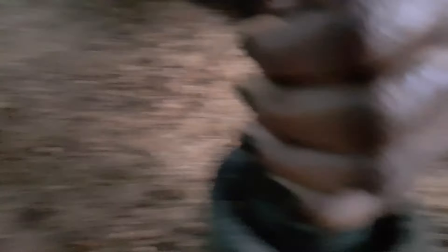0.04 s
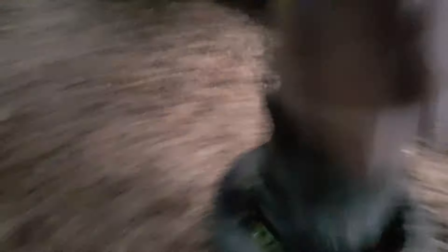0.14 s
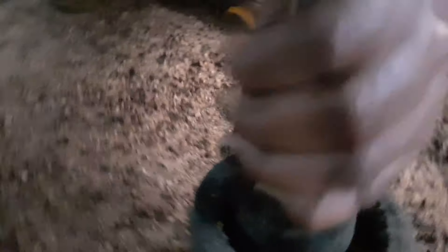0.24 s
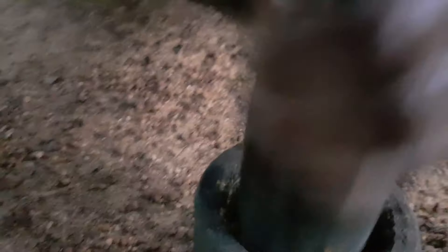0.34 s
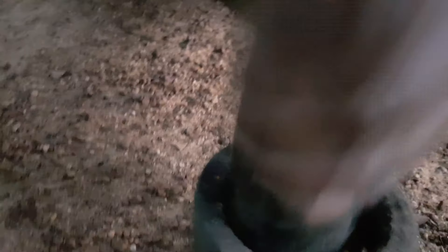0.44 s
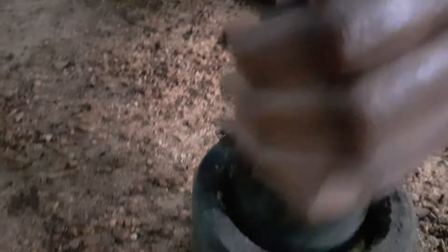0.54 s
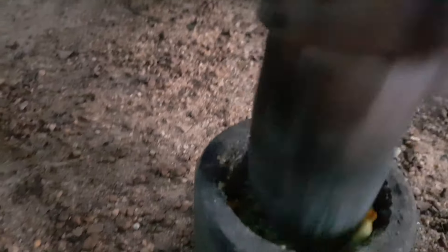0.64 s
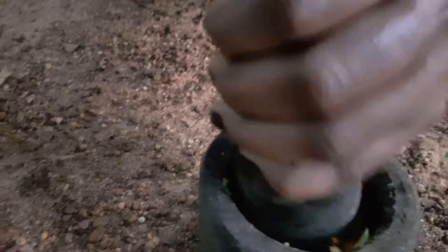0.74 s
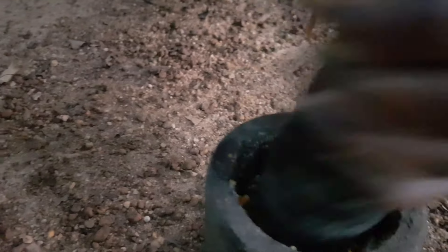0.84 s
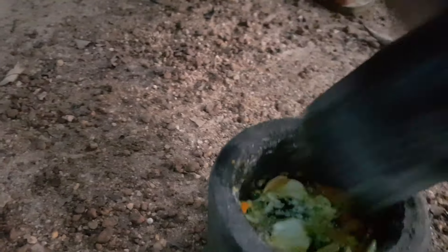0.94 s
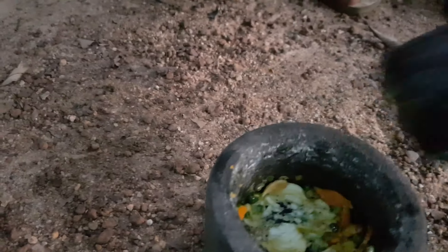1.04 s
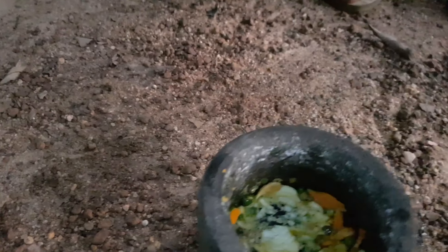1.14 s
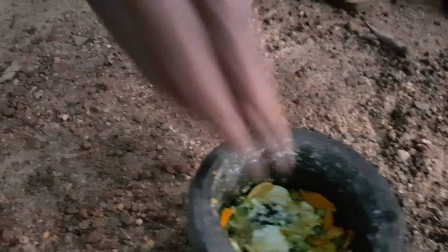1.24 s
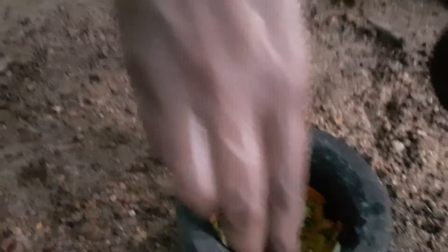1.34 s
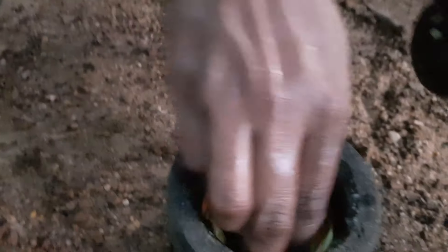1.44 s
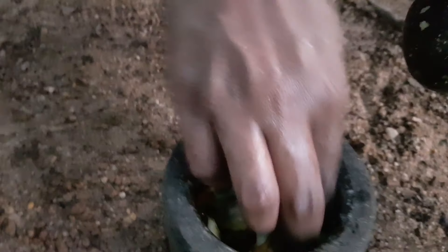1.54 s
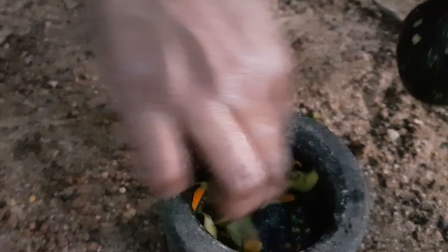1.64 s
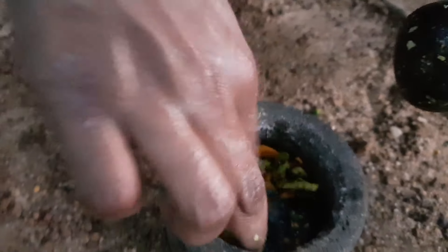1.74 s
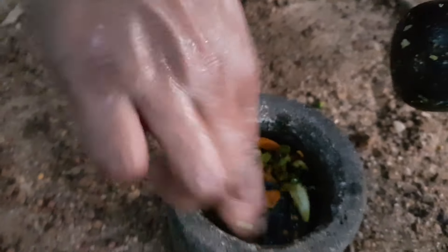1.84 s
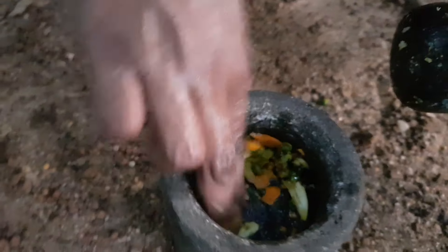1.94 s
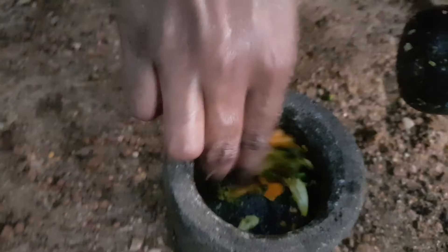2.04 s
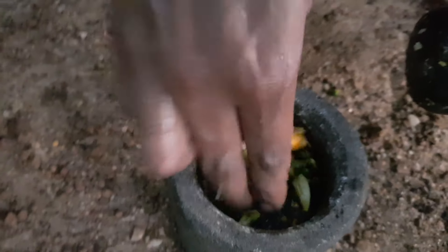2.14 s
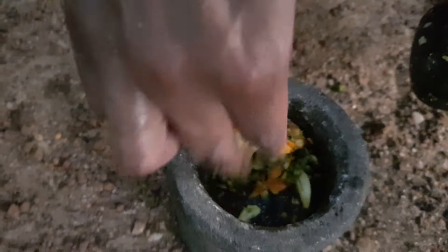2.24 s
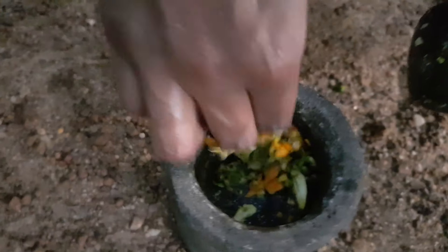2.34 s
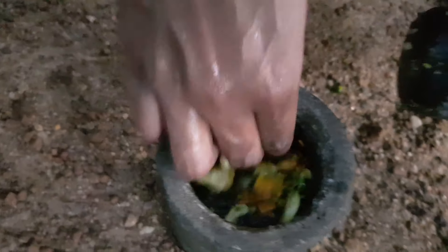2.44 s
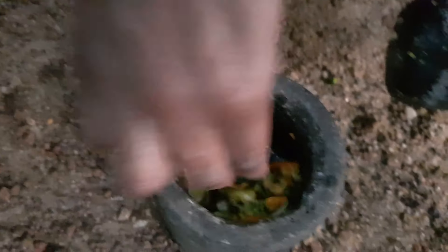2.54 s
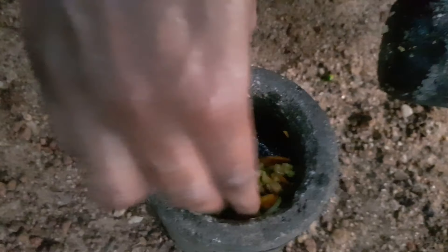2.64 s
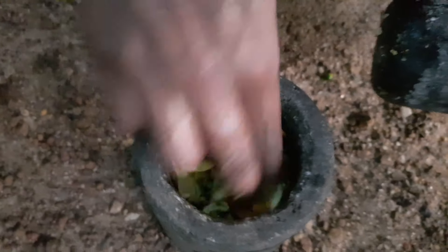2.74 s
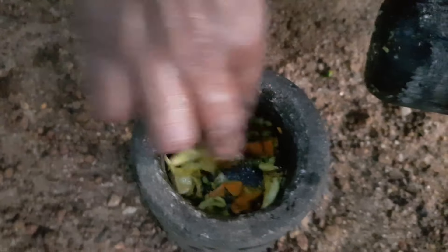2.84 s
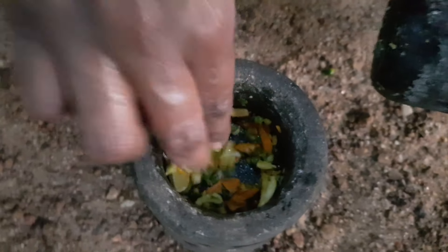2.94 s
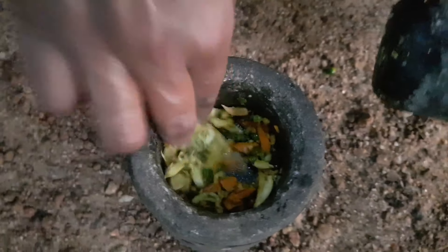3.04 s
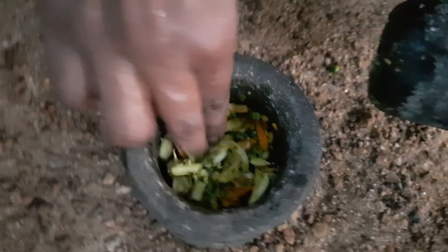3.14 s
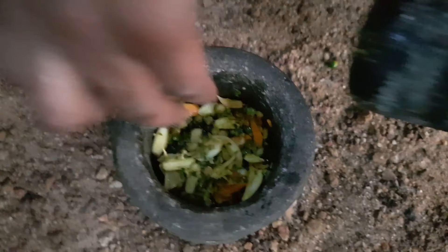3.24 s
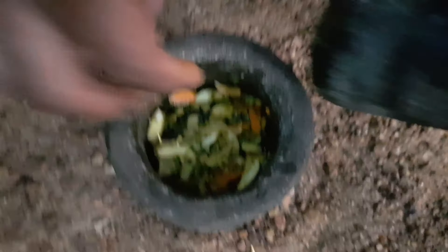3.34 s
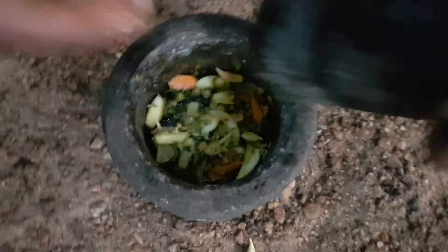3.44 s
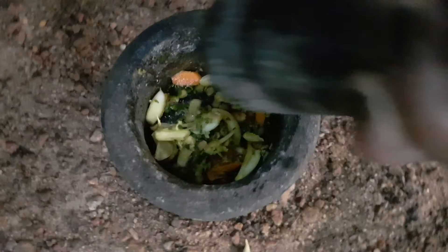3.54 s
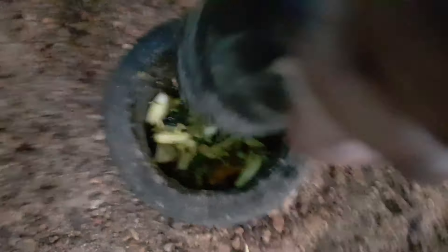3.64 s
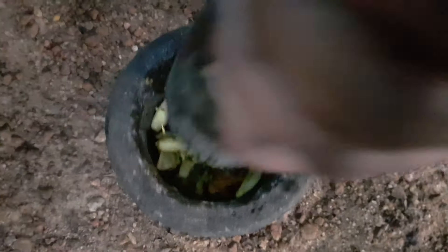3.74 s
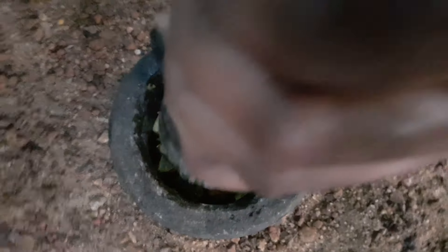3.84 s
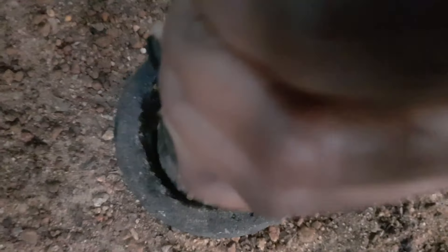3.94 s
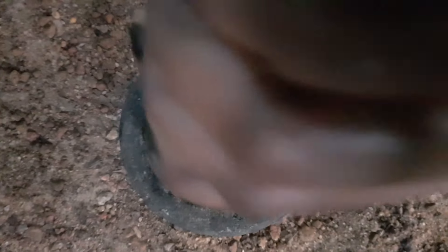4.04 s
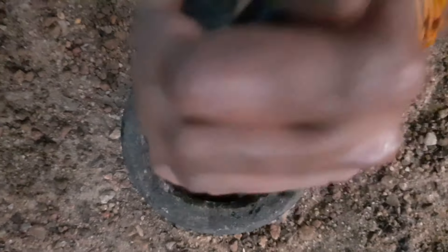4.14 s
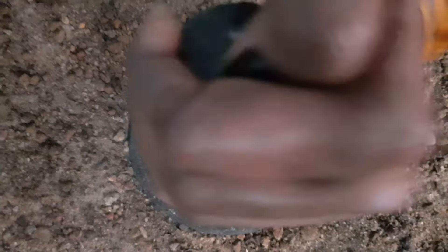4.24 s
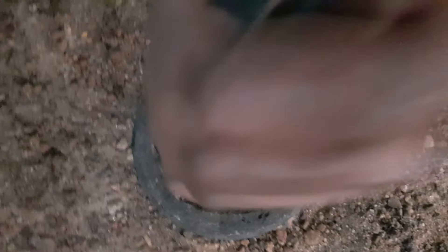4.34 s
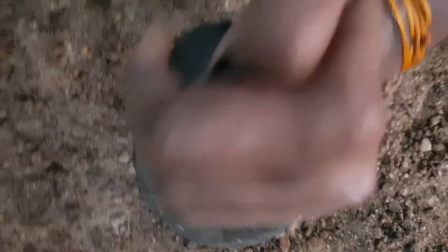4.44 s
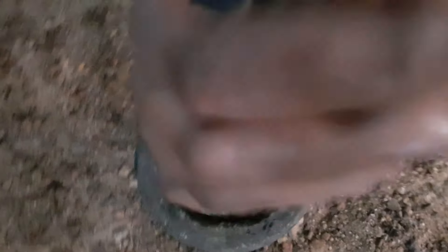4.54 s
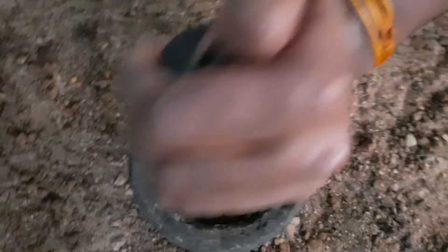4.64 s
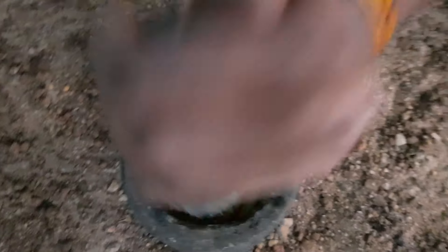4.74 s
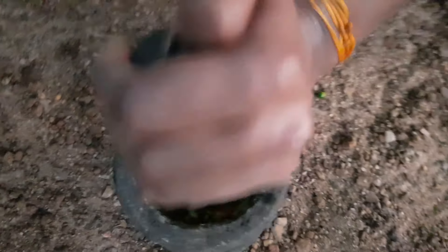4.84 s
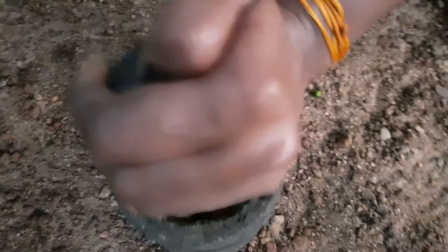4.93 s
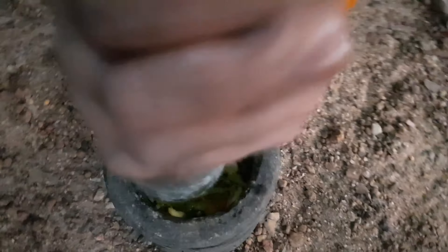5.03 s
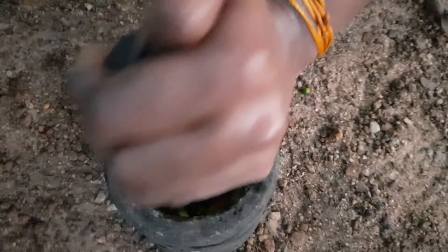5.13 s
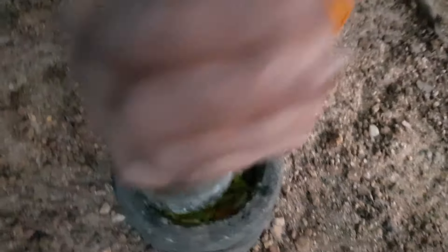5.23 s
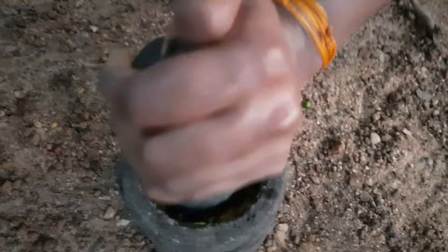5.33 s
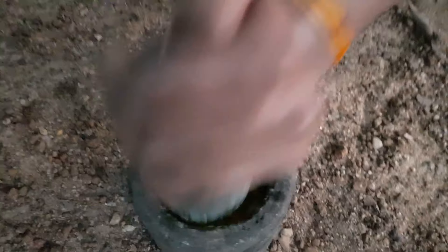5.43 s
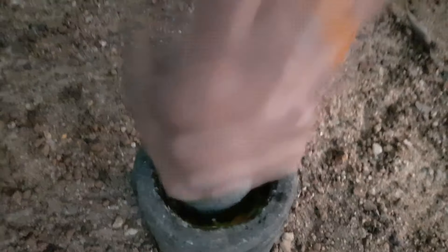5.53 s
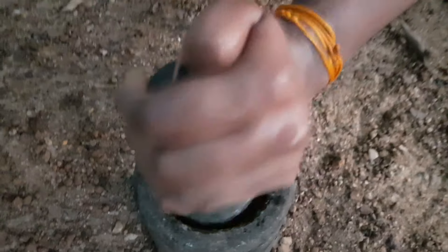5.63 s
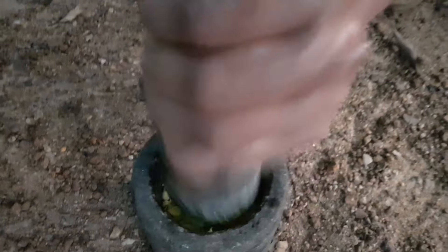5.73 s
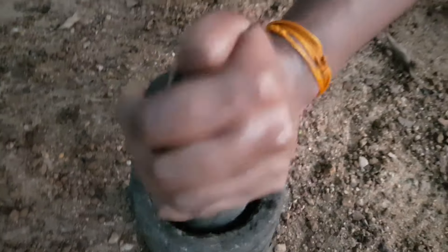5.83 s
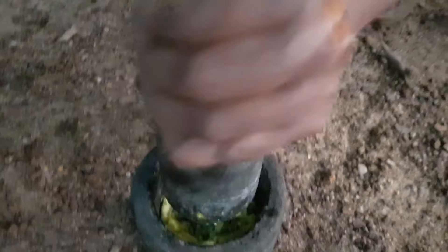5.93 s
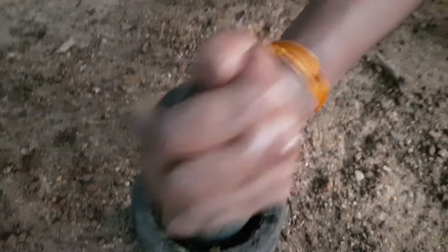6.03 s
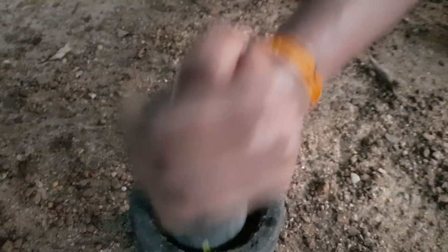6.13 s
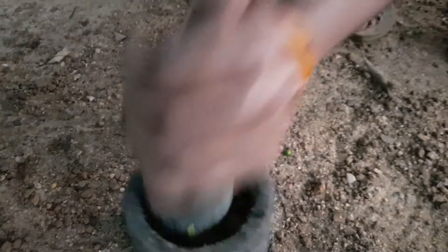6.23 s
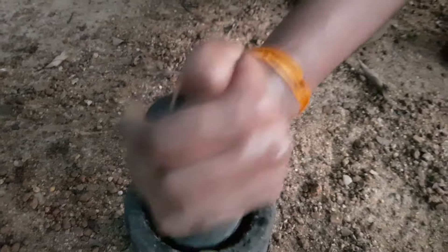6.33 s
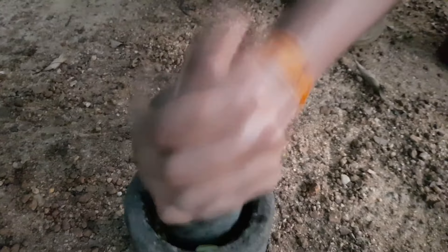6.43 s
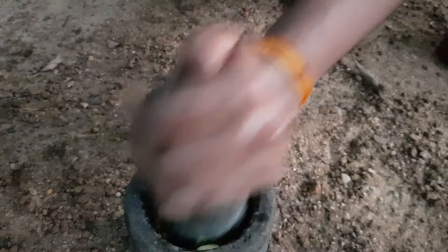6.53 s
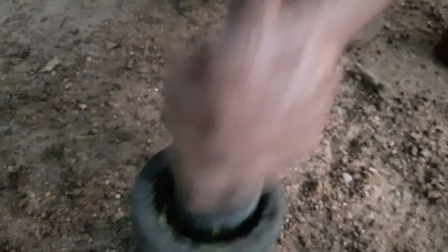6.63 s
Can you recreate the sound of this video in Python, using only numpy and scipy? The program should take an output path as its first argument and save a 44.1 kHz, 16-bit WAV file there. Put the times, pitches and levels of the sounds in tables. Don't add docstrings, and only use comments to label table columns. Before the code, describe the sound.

Close stereo microphone above a small stone mortar on bare earth. A few loud, dry stone blows, a brief rim scrape, then a quiet gap with light wet rustles of fingers turning spice. Clicking and scraping return as the pestle goes back in, followed by brisk, even pounding with crunches, short bowl ring and low thuds. Distant traffic and engine hum swell gently underneath. A sudden mute cuts off the final knock.

```python
import sys
import numpy as np
from scipy import signal
from scipy.fft import rfft, irfft, next_fast_len
from scipy.io import wavfile
from scipy.ndimage import uniform_filter1d

SR = 44100
rng = np.random.default_rng(int(sys.argv[2]) if len(sys.argv) > 2 else 0)


def field_ratio(decibels):
    return 10 ** (np.asarray(decibels, dtype=float) / 20)


def transcribe(signal):
    frames = np.atleast_2d(signal).T
    limited = np.clip(frames, -1, 1)
    pcm = np.round(limited * 32767).astype(np.int16)
    wavfile.write(sys.argv[1], SR, pcm)


N = 294572
T = np.arange(N) / SR

# (frequency [Hz], level [dB], t60 [s])
PESTLE = [(7330, -7.5, 0.07), (13090, -18, .015), (7435, -12, 0.022), (14700, -21, 0.039),
          (4600, -14.5, .012)]
# (frequency [Hz], density [dB per Hz])
GRIND = [(410, -36), (700, -6), (772, -7.5), (1030, -10.5), (1280, -5), (2060, -9.5), (4200, -19),
         (5460, -34.5), (9240, -120)]


def add(out, s, sound, pan_db):
    i = int(s * SR)
    sides = field_ratio(np.array([[pan_db], [-pan_db]]) / 2)
    out[:, i:i + sound.shape[-1]] += (sound * sides)[:, :N - i]


def shade(x, table):
    hz, db = np.transpose(table)
    size = next_fast_len(x.shape[-1], real=True)
    f = np.arange(size // 2 + 1) * SR / size + 1
    gain = field_ratio(np.interp(np.log(f), np.log(hz), db, left=-120, right=-120))
    gain = gain / np.sqrt(np.mean(gain ** 2))
    return irfft(rfft(x, size) * gain, size)[..., :x.shape[-1]]


def pair(size, alike, grit_db):
    mid, side = rng.standard_normal((2, size))
    grains = field_ratio(grit_db * np.minimum(rng.exponential(size=size), 3.5))
    alike = np.clip(alike, 0, 1)
    both = np.sqrt((1 + alike) / 2) * mid + np.sqrt((1 - alike) / 2) * side * np.array([[1], [-1]])
    return both * grains / np.sqrt(np.mean(grains ** 2))


def walk(rate_hz):
    k = int(SR / rate_hz)
    return 1.2 * uniform_filter1d(np.repeat(rng.standard_normal(N // k + 1), k), k)[:N]


def ring(t, hz, t60_s, turn_rad):
    phase = 2 * np.pi * hz * t + np.array([[0], [1]]) * turn_rad
    return np.sin(phase) * 1000 ** (-t / max(t60_s, .002))


def bed(db, table, alike, grit_db, flicker_db, rate_hz):
    return field_ratio(db + flicker_db * walk(rate_hz)) * shade(pair(N, alike, grit_db), table)


def idle():
    # (frequency [Hz], level [dB])
    orders = [(46.5, -2), (93, -3.5), (139.5, -9.5)]
    turns_s = np.cumsum(1 + .012 * walk(3.3)) / SR
    return sum(field_ratio(db + 2.5 * walk(6.5)) * np.sin(2 * np.pi * hz * turns_s) for hz, db in orders)


def road():
    # (time [s], level [dB])
    traffic = [(0.0, -55), (0.5, -55.5), (0.81, -59.5), (1.4, -55.5), (1.78, -52), (2.52, -51.5),
               (2.97, -47), (3.4, -42.5), (3.75, -42.5), (4.4, -41), (4.68, -45), (5.23, -45),
               (5.63, -46.5), (6.4, -46), (6.6, -63)]
    # (time [s], level [dB])
    motor_level = [(0, -65.5), (.65, -66.5), (1.2, -73.5), (1.9, -72), (2.5, -72), (3.05, -70), (3.2, -56),
                   (3.35, -74.5), (5.7, -70.5), (6.0, -60), (6.68, -67.5)]
    # (time [s], level [dB])
    drone_level = [
        (0, -79.5),
        (1.2, -77.5),
        (1.7, -70),
        (2.05, -66),
        (2.4, -69),
        (2.53, -59),
        (2.7, -69),
        (3.2, -65),
        (4.0, -71.5),
        (6.68, -76.5),
    ]
    # (frequency [Hz], density [dB per Hz])
    motor_band = [(470, -30), (488, 2), (500, 1.5), (520, -29)]
    drone_band = [(385, -25), (412, -1), (440, -1), (465, -25)]
    rumble_band = [(12, -47), (20, -14.5), (32, -2.5), (81, 1.5), (113, -3), (206, -11.5), (244, -12),
                   (283, -15.5), (360, -19), (470, -46.5), (790, -120)]
    hum_band = [(180, -34.5), (300, -7.5), (344, -9.5), (425, -2), (577, -9.5), (678, -12.5), (927, -21.5),
                (1000, -16), (1300, -42.5), (2200, -120)]
    tyre_band = [(1470, -33), (2500, -3.5), (3530, -6), (5560, 0.5), (8370, -14), (9870, -5.5), (15000, -3),
                 (16300, -11.5)]

    swell_db = np.interp(T, *np.transpose(traffic))
    rumble = bed(swell_db, rumble_band, 0.93, .1, 1.7, 13)
    tyres_db = .6 * (swell_db - swell_db.max())
    tyres = bed(-61.5 + tyres_db, GRIND, 0.36, 1.9, 0.7, 40)
    tyres = tyres + bed(-61 + tyres_db, tyre_band, 0.08, 1.5, 0.8, 30)
    nearest_s, span_s = 3.42, 1.3
    hum_db = -66 + 10.5 * np.exp(-((T - nearest_s) / span_s) ** 2)
    hum = bed(hum_db, hum_band, 0.15, .1, 3.3, 13.0)
    motor = bed(np.interp(T, *np.transpose(motor_level)), motor_band, 0.5, .11, 1.9, 7)
    drone = bed(np.interp(T, *np.transpose(drone_level)), drone_band, 0.47, .11, 2.4, 7.2)
    return rumble + tyres + hum + motor + drone + field_ratio(swell_db) * idle()


def strokes(rows, rise_s, fall_s):
    power = 1e-14
    for s, hold_s, db in rows:
        before_s, after_s = np.maximum(s - T, 0), np.maximum(T - s - hold_s, 0)
        power = power + field_ratio(2 * db) * np.exp(-2 * before_s / rise_s - 2 * after_s / fall_s)
    return 10 * np.log10(power)


def patchy(x, depth_db):
    cells = signal.stft(x, nperseg=256)[2]
    field = rng.standard_normal(cells.shape[1:])
    field = uniform_filter1d(uniform_filter1d(field, size=5, axis=0), size=12, axis=1)
    gain = field_ratio(depth_db * field / field.std())
    gain = gain / np.sqrt(np.mean(gain ** 2))
    return signal.istft(cells * gain, nperseg=256)[1][:, :N]


def paste():
    # (start [s], hold [s], level [dB])
    pulls = [(.1, .06, -61.5), (.3, 0.051, -59.5), (.53, 0.12, -67), (3.97, 0.083, -59), (4.21, 0.055, -57),
             (4.44, 0.031, -56), (4.68, 0.052, -58.5), (4.9, 0.082, -56), (5.13, 0.035, -53.5),
             (5.37, 0.032, -55), (5.59, 0.074, -55), (5.82, 0.073, -54), (6.08, 0.062, -62.5),
             (6.27, 0.026, -59.5)]
    # (start [s], hold [s], grind [dB], hiss [dB])
    stir = [(1.209, .02, -75, -66.5), (1.303, 0.047, -72, -51.5), (1.37, 0.054, -60, -46.5),
            (1.47, 0.016, -68, -56.5), (1.745, 0.033, -62, -56), (1.8, 0.073, -53, -50),
            (2.214, 0.037, -59, -52), (2.275, 0.036, -63.5, -54.5), (2.537, 0.038, -59, -58.5),
            (2.618, 0.03, -64.5, -58), (2.697, 0.13, -66, -74.5), (2.872, 0.07, -60.5, -53.5),
            (3.388, 0.14, -57.5, -59), (3.865, 0.04, -50, -66), (6.663, .03, -55, -59.5)]
    # (frequency [Hz], density [dB per Hz])
    pull_grit = [(800, -30), (1150, -15), (1450, -5), (2100, -8), (3000, -8), (4200, -12), (5400, -24),
                 (7000, -60)]
    hiss_band = [(1760, -35), (3000, -7), (4760, -3), (5730, -4.5), (7240, -9), (8520, -17), (9210, -8),
                 (11900, -6.5), (13000, -8.5), (15100, -8), (15900, -16.5), (16400, -26.5)]

    pull_db = strokes(pulls, .011, 0.028)
    grind_db = strokes([(s, hold_s, grind) for s, hold_s, grind, hiss in stir], 0.027, 0.021)
    hiss_db = strokes([(s, hold_s, hiss) for s, hold_s, grind, hiss in stir], 0.027, 0.021)
    pulling = bed(pull_db, pull_grit, 0.5, 4.6, 1.5, 130)
    pulling = pulling + bed(pull_db - 1.95, hiss_band, 0.17, 3.8, 1.6, 130)
    stirring = bed(grind_db, GRIND, 0.099, 3.7, 1.2, 110) + bed(hiss_db, hiss_band, 0.17, 3.7, 2.3, 110)
    return patchy(pulling + stirring, 3.1)


def slides():
    # (start [s], hold [s], level [dB], bowl [Hz], wall [Hz])
    crumb_slides = [(.085, .06, -58, 2150, 2840), (.145, .03, -60, 1380, 2840), (.3, .04, -63, 1600, 3800),
                    (.525, .07, -58, 2700, 1500), (3.97, .08, -58, 1550, 2400),
                    (4.21, .06, -58, 1650, 2400), (4.435, .04, -54, 1500, 3200),
                    (4.68, .06, -57, 1600, 2500), (4.895, .05, -54, 1700, 3900),
                    (5.125, .05, -55, 1750, 2500), (5.37, .06, -55, 1890, 2800),
                    (5.59, .065, -53, 2400, 3200), (5.82, .06, -57, 1750, 2200),
                    (5.92, .03, -60, 1250, 2000), (6.075, .03, -56, 1250, 3000),
                    (6.33, .05, -63, 1500, 2300), (1.29, .14, -62, 1280, 2600),
                    (1.76, .11, -59, 1300, 3000), (3.862, .04, -50, 1350, 1900),
                    (5.19, .04, -60, 1900, 2900)]
    out, t = np.zeros((2, N)), np.arange(int(.25 * SR)) / SR
    f = np.fft.rfftfreq(len(t), 1 / SR)
    width_hz, rise_s, fall_s = 110, .006, .035
    for s, hold_s, db, bowl_hz, wall_hz in crumb_slides:
        bowl = 1 / (1 + ((f - bowl_hz) / width_hz) ** 2)
        stone = 1 / (1 + ((f - wall_hz) / width_hz) ** 2)
        gain = bowl + field_ratio(-3) * stone
        gain = gain / np.sqrt(np.mean(gain ** 2))
        envelope = np.minimum(t / rise_s, 1) * np.exp(-np.maximum(t - hold_s, 0) / fall_s)
        crumbs = field_ratio(-3.0) * pair(len(t), .6, 3.0) * envelope
        add(out, s, field_ratio(db) * irfft(rfft(crumbs) * gain, len(t)), 0)
    return out


def scrapes():
    # (start [s], end [s], level [dB], slip rate [1/s])
    drags = [
        (0.683, 0.741, -50, 1520),
        (0.738, 0.76, -51, 660),
        (0.533, 0.619, -59, 800),
        (3.298, 3.519, -53, 270),
        (3.849, 3.905, -52, 400),
        (4.048, 4.06, -49, 500),
    ]
    # (frequency [Hz], density [dB per Hz])
    tick_band = [(290, -39), (500, -4.5), (833, -8.5), (1300, -4.5), (2080, -10.5), (3180, -4), (3450, -30),
                 (5000, -36), (6500, -46.5), (11000, -120)]
    draw = rng.random(N)
    slips = sum(field_ratio(db) * ((T > a) & (T < b) & (draw < rate_hz / SR)) for a, b, db, rate_hz in drags)
    slips = slips * rng.standard_normal(N)
    t = np.arange(int(.12 * SR)) / SR
    tick_envelope = (t > .002) * np.exp(-(t - .002) / .0015)
    tick = shade(pair(len(t), 0.31, 0.089) * tick_envelope, tick_band)
    pestle = sum(field_ratio(db) * ring(t, f, t60_s, 0.27) for f, db, t60_s in PESTLE)
    return signal.fftconvolve(slips[None], tick + field_ratio(-12.0) * pestle, axes=1)[:, :N]


def wall(hz, luck):
    t = np.arange(int(.05 * SR)) / SR
    modes = ring(t, hz, 0.0085, .5 * luck[0]) + field_ratio(-9.5) * ring(t, hz, .012, 0.34 * luck[1])
    return (1 - np.exp(-(t / 0.00041) ** 2)) * modes


def wall_hits():
    # (time [s], peak [dB], frequency [Hz], left minus right [dB])
    hits = [(0.0519, -4, 2845, 0), (0.063, -13.5, 3267, -2.5), (0.2773, -23.5, 2537, -4),
            (0.4943, -3.5, 2618, 0.0), (0.6797, -14.5, 2670, 2.5), (3.4455, -52, 2170, -1),
            (3.9109, -20, 2800, 6), (3.9508, -15, 2350, -6.5), (4.1888, -22, 2426, -4.5),
            (4.321, -31.5, 2690, 4), (4.6343, -18, 2870, -0.5), (4.6462, -14, 2458, 2),
            (4.8155, -40.5, 2665, -0.5), (4.989, -23.5, 2240, -3), (5.5702, -4, 3123, 0),
            (5.7968, -7.5, 2875, 4.5), (6.0187, -12, 3072, -7.5), (6.2971, -30.5, 3175, -7),
            (6.4249, -16, 2279, -6), (4.9895, -29, 2914, 3), (5.009, -36.5, 2460, 0.5),
            (6.029, -33, 3100, 2), (6.4255, -22, 3077, 0), (4.6345, -20.5, 2200, 0), (.278, -15.5, 1070, 0),
            (5.1097, -11, 1220, 1), (5.3429, -16, 2160, 3), (3.2402, -28, 730, 4), (3.46, -32, 560, 0.5),
            (3.364, -44, 14000, 0.5), (3.371, -49, 14750, 0.5), (3.407, -50, 15400, 0.5),
            (3.447, -51, 13050, 0.5), (3.242, -46, 13050, 0.5), (3.464, -49, 14750, 0.5),
            (4.635, -42, 14800, 0.5), (6.2431, -16.5, 980, 3), (4.8792, -15, 770, 7),
            (.2645, -44, 3100, 0.5), (.2695, -40, 1300, 0.5), (.2725, -40, 1200, 0.5),
            (.0485, -38, 2500, 0.5), (4.19, -23, 1120, 0.5), (3.971, -36.5, 1550, 0.5),
            (5.149, -43, 3300, 0.5), (.151, -50, 1350, 0.5), (.165, -51, 1300, 0.5),
            (6.0295, -38, 4600, 0.5)]
    # (time [s], peak [dB], frequency [Hz])
    centred_hits = [(5.3445, -12, 1150), (5.573, -9, 2500), (5.118, -30, 3650), (5.351, -26, 2900),
                    (6.0612, -16, 3900), (6.2435, -22, 3400), (5.7972, -13, 2200), (.0525, -12, 2200),
                    (3.407, -42, 3100), (3.368, -43, 2700), (5.803, -25, 780), (.6925, -38, 650)]
    out, lag_s = np.zeros((2, N)), .001
    for s, db, hz, pan_db in hits + [(s, db, hz, 0) for s, db, hz in centred_hits]:
        add(out, s + lag_s, field_ratio(db + 3.0) * wall(hz, rng.standard_normal(2)), pan_db)
    return out


def knock(hz, ring_db, t60_ms, luck):
    t = np.arange(int(.16 * SR)) / SR
    bowl = ring(t, hz, t60_ms / 1000 * (1200 / hz) ** 1.7, 0.045 * luck[0])
    bowl = bowl + field_ratio(-11.5) * ring(t, 1.28 * hz, 0.0052, 0.79 * luck[1])
    bowl = bowl + field_ratio(-13.5) * ring(t, .62 * hz, 0.01, 0.42 * luck[1])
    pestle = sum(field_ratio(db) * ring(t, f, t60_s, .5 * luck[2]) for f, db, t60_s in PESTLE)
    pestle = pestle * (1 - np.exp(-t / 0.002))
    chips = field_ratio(-19.5) * shade(pair(len(t), 0.29, 6.5), GRIND) * np.exp(-t / 0.0045)
    crack = field_ratio(-27.0) * pair(len(t), 0.65, 3.3) * np.exp(-t / 0.0006)
    onset = 1 - np.exp(-(t / 0.00055) ** 2)
    return onset * (bowl + field_ratio(ring_db + 2.0) * pestle + chips + crack)


def knocks():
    # (time [s], peak [dB], bowl [Hz], pestle ring [dB], left minus right [dB])
    hard = [(0.0518, 1.5, 1267, -32, 2), (0.0635, 2.6, 1604, -41.5, 1), (0.2779, -2, 1632, -44, -6),
            (0.4944, -2, 1409, -15, 2.5), (0.5006, -18.5, 1640, -17.5, -3.5),
            (0.6796, -22.5, 1790, -15.5, 9), (3.9106, 2, 1164, -24, -1.5),
            (3.9513, -5.5, 1503, -47.5, -1.5), (4.1886, -18, 1676, -26.5, -4),
            (4.4178, -10, 1671, -21, 2.5), (4.6341, -7, 1234, -37.5, -5), (4.6465, 1.26, 1539, -47, 0.5),
            (4.879, -0.3, 1576, -41.5, -0.5), (5.1096, -2.5, 1720, -61.5, -2),
            (5.3437, 6.5, 1839, -46, 3.5), (5.5703, -4, 1522, -32, -5.5), (5.797, -4, 1437, -35.5, 10),
            (6.0187, 1, 1199, -27, -5), (6.0609, -23.5, 1650, -21.5, -4), (6.2433, -5.5, 1572, -41, 6.5),
            (6.4229, -4.5, 1184, -28.5, 9.5)]
    # (time [s], peak [dB], bowl [Hz], pestle ring [dB], left minus right [dB])
    touches = [(0.6923, -33.5, 1330, -4, 14), (3.24, -23, 1060, -17.5, -7), (3.3064, -34.5, 1270, -8, 1),
               (3.458, -19, 2080, -30, -1), (3.477, -28, 1180, -8, 10), (3.8505, -26.5, 1590, -41.5, -4.5),
               (4.0985, -33.5, 1153, 1.5, -6), (4.322, -21.5, 1180, -10.5, 2.5), (4.816, -36, 1950, -34, 5),
               (4.977, -39.5, 1370, -11.5, -5), (4.989, -20.5, 1230, -12.5, 10),
               (5.009, -24.5, 1170, -13, 8), (5.68, -39.5, 1270, -15, -1), (6.164, -44.5, 1185, -20, 4),
               (6.2969, -41, 905, -36, 2), (4.207, -35, 1562, -26.5, 0.5), (6.029, -34, 1302, -1.5, -0.5),
               (6.154, -44, 1199, -25, 0.5)]
    # (time [s], peak [dB], bowl [Hz])
    chatter = [(3.2534, -36, 1330), (3.3121, -35.5, 975), (3.3611, -29, 1320), (3.368, -33, 1070),
               (3.3823, -27.5, 1220), (3.391, -27, 1070), (3.407, -29.5, 1190), (3.4167, -35.5, 1220),
               (3.4227, -31.5, 1260), (3.4334, -33.5, 1210), (3.445, -26.5, 1210), (3.4986, -30, 1210),
               (3.5107, -28, 1180), (3.324, -37.5, 1260), (3.463, -33, 1190), (3.488, -36, 1190)]
    hits = [(s, db, hz, ring_db, pan_db, 16.1 if db > -22.5 else 15)
            for s, db, hz, ring_db, pan_db in hard + touches]
    hits += [(s, db + 1.5, hz, -20.5, 10, 12.5) for s, db, hz in chatter]
    out, lag_s = np.zeros((2, N)), .001
    for s, db, hz, ring_db, pan_db, t60_ms in hits:
        sound = knock(hz, ring_db, t60_ms, rng.standard_normal(3))
        add(out, s + lag_s, field_ratio(db + 0.5) * sound, pan_db)
    return out


def crush(ms, tail_db, bright_db, lead_s):
    # (frequency [Hz], density [dB per Hz])
    crush_band = [(350, -28.5), (600, -2), (960, -7.5), (1770, 5), (2670, -1.5), (3680, 2), (7440, -5),
                  (8320, -11.5), (10700, -3), (11400, -5), (12600, -9), (15300, -10), (16400, -30)]
    t = np.arange(int(.2 * SR)) / SR - lead_s
    swell = np.exp(-(t / (0.00053 * ms)) ** 2) + field_ratio(tail_db - 5.0) * np.exp(t / 0.0022)
    fall = np.exp(-t / (.33e-3 * ms)) + field_ratio(tail_db) * np.exp(-t / 0.0053)
    fall = fall + field_ratio(tail_db - 18.5) * np.exp(-t / 0.054)
    colour = [(hz, db + bright_db * np.log2(hz / 4000)) for hz, db in crush_band]
    return shade(pair(len(t), 0.052, 4.7), colour) * np.where(t < 0, swell, fall)


def thud(luck, stiffness, rebound, lead_s):
    # (frequency [Hz], level [dB], t60 [s])
    earth_modes = [(96, -13.5, 0.074), (173.2, -15.5, 0.091)]
    t = np.arange(int(.11 * SR)) / SR - lead_s
    late = stiffness * np.maximum(t, 0) / 0.0024
    soft = (rebound / 1.465) ** 2
    phase = np.pi * 1.02 * np.log2(1 + late) + np.minimum(t, 0) * 2 * np.pi * 300 / soft
    rise = np.exp(-(t / (0.0011 * soft)) ** 2)
    fall = (1 + late / 1.2) * np.exp(-late / rebound) + field_ratio(-10.5) * np.exp(-late / 7)
    swing = np.cos(phase) * np.where(t < 0, rise, fall)
    rock = 0
    for (hz, db, t60_s), one in zip(earth_modes, luck[1:]):
        rock = rock + field_ratio(db) * np.sin(2 * np.pi * hz * (1 + 0.04 * one) * t) * 1000 ** (-t / t60_s)
    rock = rock * (1 - np.exp(-(late / 3) ** 2))
    return (swing + rock) * np.minimum(1, (t[-1] - t) / .02)


def blows():
    # (time [s], crush [dB], length [ms], brightness [dB/octave], left minus right [dB])
    spice_blows = [(0.0645, -21, 2.5, 0.1, -2.5), (0.2796, -26, 3.4, -0.9, 2), (0.5022, -20.5, 3, 0.1, 5.5),
                   (3.9494, -21.5, 4.8, 0.2, 10.5), (4.1917, -19.5, 5, 2, 2.5), (4.4191, -12, 3.8, 1, -1),
                   (4.6518, -14.5, 3, -0.4, -2.5), (4.8806, -12.5, 3.2, 2.2, -1.3),
                   (5.1112, -20, 2.6, -0.95, 4), (5.3456, -16.5, 2.6, 0.5, 2),
                   (5.5743, -16, 4.5, -1.3, -0.7), (5.8047, -17, 3.1, -0.5, 3.5),
                   (6.0631, -18.5, 4.2, 3, 2.5), (6.2438, -21.5, 2.16, -0.1, 0.5)]
    # (time [s], level [dB], stiffness [ratio], rebound [ratio])
    thuds = [(0.0673, -3, 1.1, 1.2), (.2814, -6.5, 1.05, 1.3), (0.5047, -14, 1.02, 1.7),
             (3.9524, -9.5, 0.85, 1.7), (4.1938, -3.5, .98, 1.8), (4.4209, -1.5, 1.02, 1.6),
             (4.6538, -4, 1.03, 1.4), (4.8827, 0.86, 1.05, 1.5), (5.1131, -5, 1.05, 1.6),
             (5.3477, .3, 1.08, 1.4), (5.5765, -7, 1.1, 1.7), (5.8069, -2, 1.08, 1.2),
             (6.0651, -9.5, 1.1, 1.5), (6.246, -4.5, 1.05, 1.5)]
    # (time [s], level [dB])
    bumps = [
        (3.2415, -28),
        (3.462, -38),
        (3.7, -41.5),
        (6.673, -50),
        (6.4265, -23),
        (0.0655, -16),
    ]
    # (time [s], level [dB], length [ms])
    snaps = [(6.26, -39, 8.0), (0.3, -45, 6.1), (5.65, -46, 4.5), (6.0675, -29, 5.5), (0.313, -50.5, 4.4),
             (0.52, -33, 3), (1.874, -31.5, 0.93), (3.459, -25.5, 1.1), (3.958, -32, 1.8),
             (4.113, -49, 3.4), (5.012, -49.5, 4.5), (6.3, -31, 4.2), (5.596, -40, 6.5), (6.031, -48, 5.5),
             (6.306, -44, 2.5), (0.083, -46, 3.5)]
    out, luck = np.zeros((2, N)), rng.standard_normal((len(thuds), 3))
    crush_lead_s, thud_lead_s = .02, .003
    for s, db, ms, bright_db, pan_db in spice_blows:
        add(out, s - crush_lead_s, field_ratio(db + 6.0) * crush(ms, -19.0, bright_db, crush_lead_s), pan_db)
    for (s, db, stiffness, rebound), row in zip(thuds, luck):
        add(out, s - thud_lead_s, field_ratio(db - 6) * thud(row, stiffness, rebound, thud_lead_s), 0)
    for s, db in bumps:
        add(out, s - thud_lead_s, field_ratio(db) * thud(luck[0], 1.8, 1.3, thud_lead_s), 0)
    for s, db, ms in snaps:
        add(out, s - crush_lead_s, field_ratio(db) * crush(ms, -40.5, 0, crush_lead_s), 0)
    return out


def scene():
    return road() + paste() + slides() + scrapes() + wall_hits() + knocks() + blows()


def low_pass(x):
    return signal.sosfilt(signal.butter(12, 15850, fs=SR, output="sos"), x)


def record(dry):
    # (frequency [Hz], left lead [rad])
    port_lead = [(0, 0), (1550, 0.7), (2330, -0.0), (2840, 0.9), (3790, -0.3), (5340, -3.9), (6800, -5.2),
                 (8100, -8.7), (9300, -11.3), (10500, -5.6), (11500, -3.7), (13800, -6.0), (14600, -2.0),
                 (16100, -3.6)]
    # (frequency [Hz], left minus right [dB])
    port_db = [(60, 1), (110, -2.5), (200, -1.5), (380, -2), (700, 1), (1290, -2.5), (2380, -1),
               (4400, -2.5), (8120, 1.5), (11500, -1), (15000, -0.5)]
    # (start [s], end [s])
    mute_s = (6.4308, 6.6705)
    size = next_fast_len(N, real=True)
    f = np.arange(size // 2 + 1) * SR / size + 1
    lead_rad = np.interp(f, *np.transpose(port_lead))
    tilt_db = np.interp(f, *np.transpose(port_db))
    port = field_ratio(tilt_db / 2) * np.exp(.5j * lead_rad)
    low_cut = 1 / np.sqrt(1 + (47 / f) ** 12)
    ports = irfft(rfft(dry, size) * low_cut * np.array([port, 1 / port]), size)[:, :N]
    on = (T < mute_s[0]) | (T > mute_s[1])
    return low_pass(np.clip(ports, -1, 1) * uniform_filter1d(1. * on, size=70))


dry = scene()
out = record(dry)
transcribe(out)
```